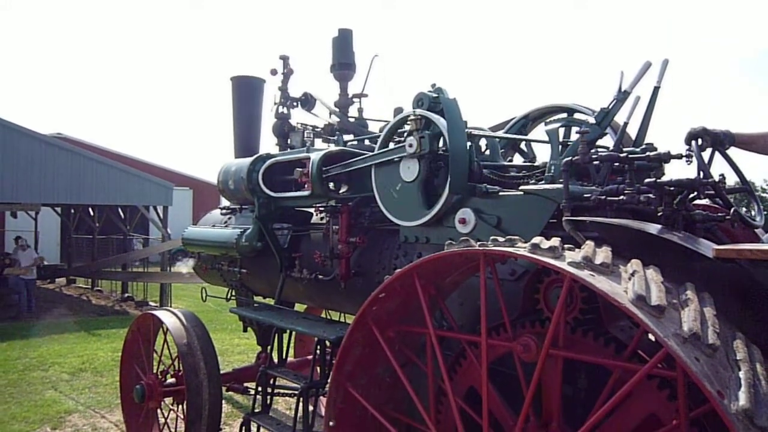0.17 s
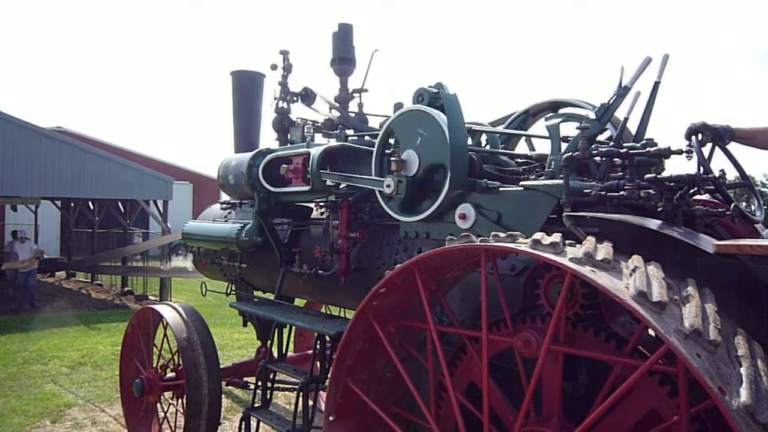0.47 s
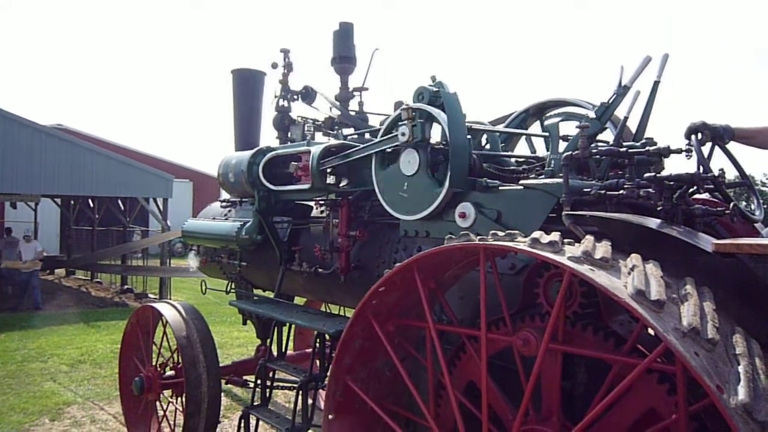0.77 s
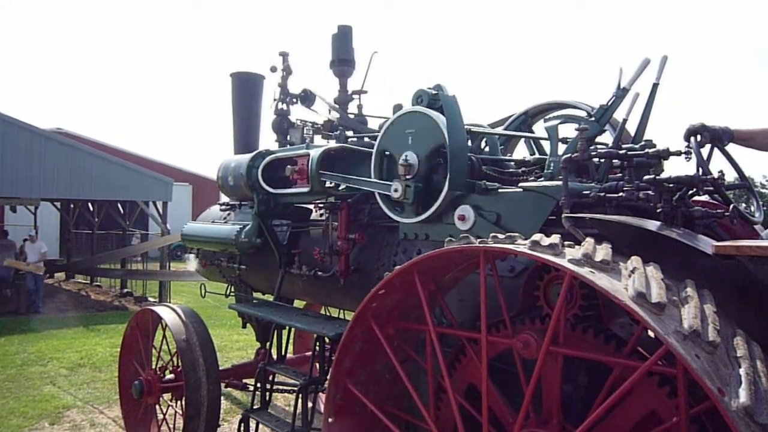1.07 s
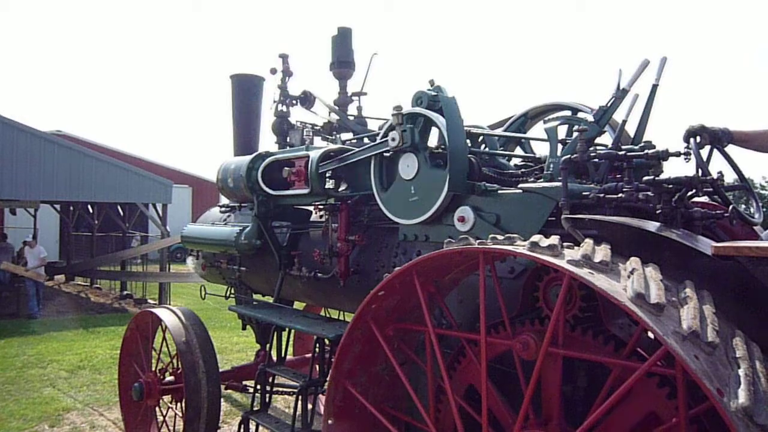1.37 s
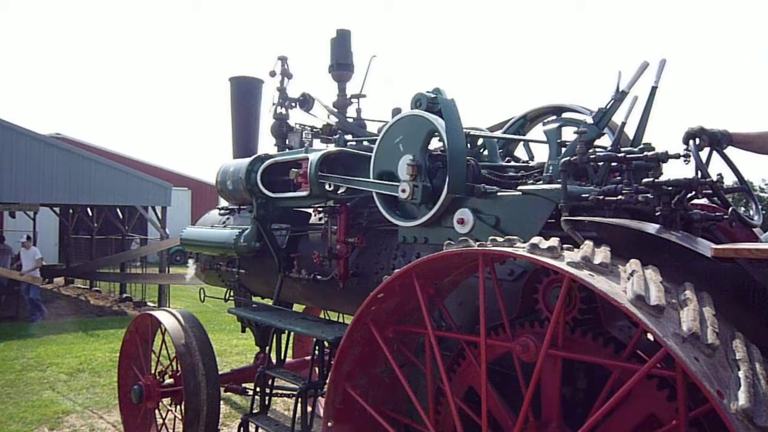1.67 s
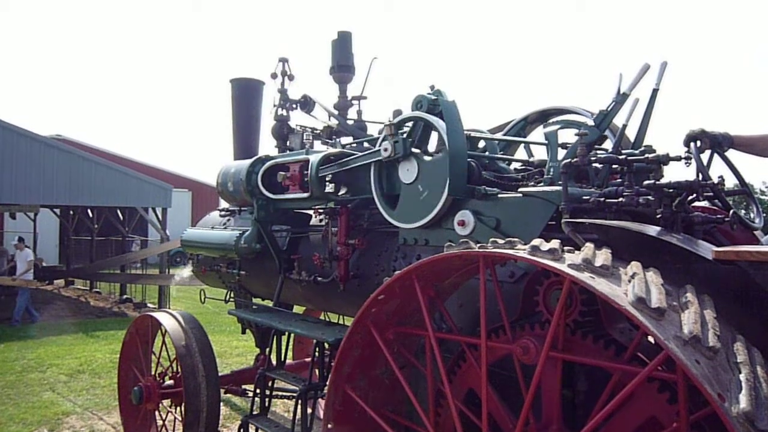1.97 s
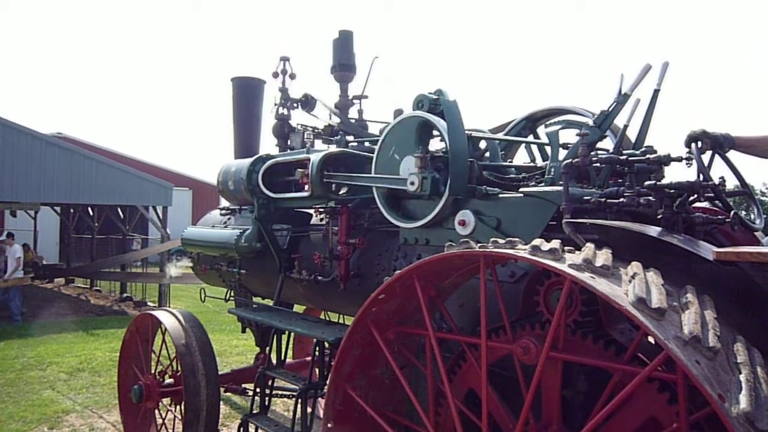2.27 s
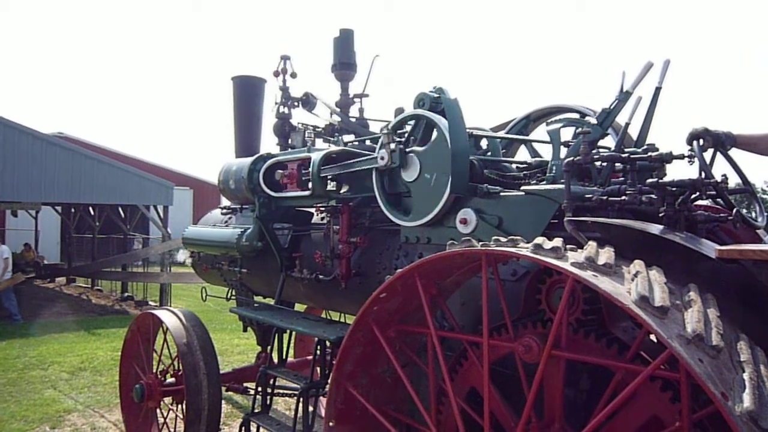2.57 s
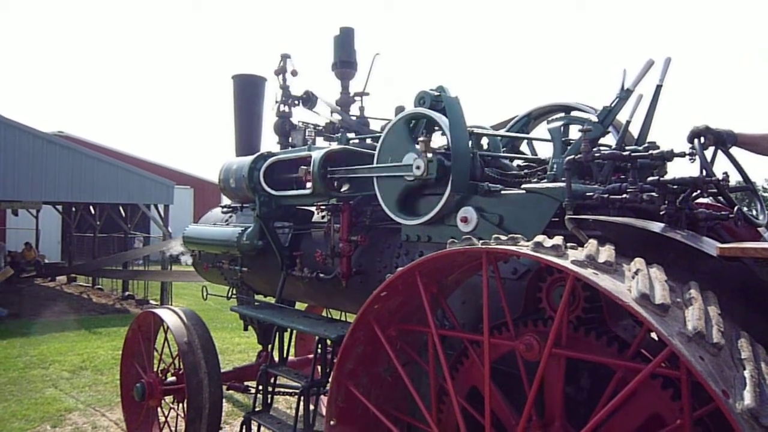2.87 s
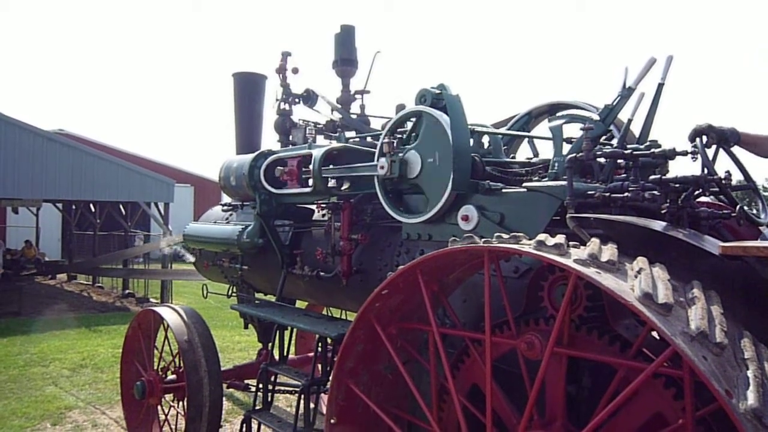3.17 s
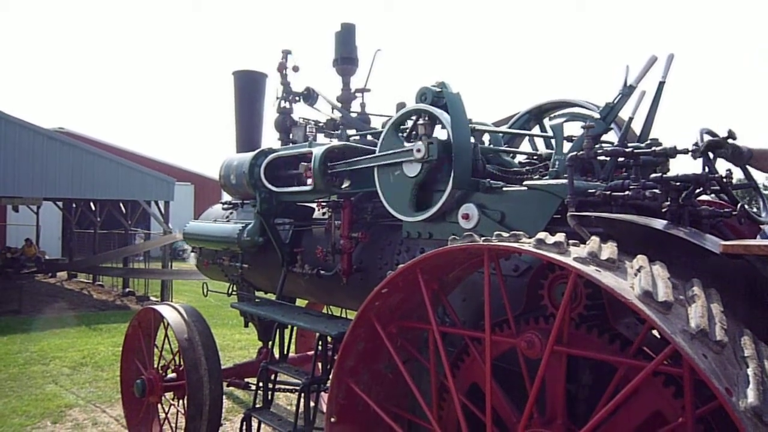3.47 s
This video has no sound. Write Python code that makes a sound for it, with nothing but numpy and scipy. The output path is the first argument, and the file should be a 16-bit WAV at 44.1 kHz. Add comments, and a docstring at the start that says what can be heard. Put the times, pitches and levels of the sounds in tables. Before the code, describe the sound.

Close to a steam traction engine on an open show ground, bearings and gears knock in the same fast pattern throughout, over droning rumble; faint low puffs, a little hiss and thin squeals. Dull, narrow-band sound.

```python
"""A steam traction engine turns over steadily on a show ground, about five turns a second, heard from close by.
Its bearings, gears and valve gear knock in the same pattern every turn: noise bursts exciting resonances.
Beneath lie the drive's rumble, part periodic and part random, the gear's notes and humming plates (narrow noise).
A second engine puffs dully at its own slower pace (decaying sines); a little steam spits (filtered noise)
and squeals faintly (wavering sines), and there is one thin, bright tick (a band-passed decay)."""
import sys
import numpy as np
from scipy import signal
from scipy.fft import rfft, irfft
from scipy.io import wavfile

SR = 44100
rng = np.random.default_rng(int(sys.argv[2]) if len(sys.argv) > 2 else 0)


def wav_record(signal):
    """Record a signal, one row per channel, as 16-bit PCM in the file named by sys.argv[1]."""
    frames = np.transpose(np.atleast_2d(signal))
    bounded = np.clip(frames, -1, 1)
    # unit amplitude maps onto the largest positive 16-bit level
    quanta = np.round(bounded * 32767).astype(np.int16)
    wavfile.write(sys.argv[1], SR, quanta)


N = 160083
SIZE, LEAD = 8192, 400  # samples: length of one event, and silence ahead of a burst

# turns of the crankshaft: t/s, then level changes of the crank knock/dB, crosshead knock/dB,
# return stroke/dB and clinks of the forward stroke/dB
TURNS = [(-0.043, 3, 3, -0.5, 1.5), (0.1612, 0, -1.8, -1, 0.1), (0.366, 0.5, -1.3, 1.8, -2.1),
         (0.572, 0.8, 1.7, 0, -0.2), (0.7767, -1, 2, 2.5, -1.8), (0.983, -0.5, 0.5, 0.5, 1.4),
         (1.188, -2, 3.2, -0.1, -1.2), (1.3711, -8, -0.3, 1.4, -5.5), (1.5755, 0.1, 1.8, -2, -4.5),
         (1.78, 0.8, -4, 1, -3), (1.986, -1, -2.5, 2, -1.4), (2.191, 0.3, 0.2, -1.6, -2.6),
         (2.396, -0.2, 0.5, 0.5, -1.7), (2.6013, -1.6, 1.3, -0.2, -5.8), (2.807, 0.8, -3, 0, -3.4),
         (3.013, 1.1, 1.6, 4.1, 0.5), (3.2187, 1.5, -1.9, 2.7, 0.2), (3.4247, -0.2, 2, -0.8, -2.2),
         (3.63, -1, 0.0, 10, 5)]
# resonances of the moving parts: f/Hz, half width/Hz, relative level/dB
CRANK = [(189, 68, -9.5), (473, 88, -3.5), (905, 42, -1.5), (986, 77, -1.5), (1270, 90, -8),
         (1510, 190, -12.5), (1800, 151, -12), (2310, 110, -19), (2850, 91, -18), (3180, 300, -19),
         (3646, 175, -21)]
GEARS = [(540, 280, -18), (860, 29, -8), (1006, 55, -2), (1290, 95, -10), (1440, 45, -16),
         (1770, 260, -20.5), (2700, 320, -11.5), (3440, 260, -13.5)]
CROSSHEAD = [(236, 45, -3.5), (459, 27, 2.5), (650, 390, -8.5), (925, 115, -4), (1160, 45, -5),
             (1270, 94, -15), (1680, 23, -10), (1940, 330, -19), (2445, 110, -13), (2820, 53, -21.5),
             (3235, 76, -11.5), (3600, 200, -20.5)]
VALVE = [(367, 87, -1), (626, 26, 2), (892, 350, -4.5), (974, 390, -15.5), (1210, 65, 3.5),
         (1710, 470, -18), (1857, 51, 0), (2720, 200, -20)]
PIN = [(256, 100, -9), (456.5, 260, -22.5), (608, 97, -4), (930, 380, -2.5), (1335, 50, 0),
       (1710, 48, -4.5), (1884, 25, -7.5), (2260, 160, -19), (2850, 52, -11.5), (3360, 220, -18.5)]


def amp(db):
    """Level to amplitude ratio: 20 dB is a factor of ten."""
    return 10 ** (np.asarray(db) / 20)


def evened(x):
    """Normalization to unit rms, that is unit mean power."""
    return x / np.sqrt(np.mean(x ** 2) + 1e-20)


def add(mix, s, sound):
    """Linear superposition of a sound, starting at s seconds."""
    at = round(s * SR)
    sound = sound[max(-at, 0):]
    part = mix[max(at, 0):][:len(sound)]
    part += sound[:len(part)]


def coloured(x, points):
    """Zero-phase filtering: gains at (f/Hz, level/dB) points are joined along a logarithmic frequency axis."""
    hz, db = np.transpose(points)
    f = np.fft.rfftfreq(len(x), 1 / SR)
    gain = amp(np.interp(np.log(f + 1), np.log(hz), db))
    return irfft(rfft(x) * gain, len(x))


def wander(hz):
    """Band-limited random motion: white noise under a Gaussian low-pass, with unit rms."""
    f = np.fft.rfftfreq(N, 1 / SR)
    lowpass = np.exp(-(f / hz) ** 2)
    return evened(irfft(rfft(rng.standard_normal(N)) * lowpass, N))


def whitened(x):
    """Spectral flattening: the phases, which carry the timing, stay while every magnitude becomes equal."""
    phase = np.angle(rfft(x))
    return evened(irfft(np.exp(1j * phase), len(x)))


def response(modes):
    """Modal superposition: resonances add in power, and the cepstrum gives the causal minimum phase."""
    f = np.fft.rfftfreq(SIZE, 1 / SR)
    power = sum((amp(db) / (1 + ((f - hz) / width) ** 2)) ** 2 for hz, width, db in modes)
    gain = evened(np.sqrt(power))
    cepstrum = irfft(np.log(gain + 1e-5))
    cepstrum[1:SIZE // 2] *= 2
    cepstrum[SIZE // 2 + 1:] = 0
    return np.exp(rfft(cepstrum))


def rattle(rise_s, decay_s):
    """Contact excitation: a bearing taking up its slack makes a burst of tiny impacts, an enveloped noise."""
    tail_db, tail_s = -18, 0.0099  # the boiler and frame ring on after a knock
    t = np.maximum(np.arange(SIZE) - LEAD, 0) / SR
    rise = np.minimum(t / rise_s, 1)
    decay = np.exp(-np.maximum(t - rise_s, 0) / decay_s)
    tail = amp(tail_db) * np.exp(-t / tail_s)
    return evened(rise * (decay + tail) * rng.standard_normal(SIZE))


def strikes(modes, times, levels_db, rise_s, decay_s, alike):
    """Source-filter principle: one contact's force, partly alike on every turn, drives the part's resonances."""
    slack_s, spread_db = .0006, 0.43  # play in the bearings: scatter of time and strength
    out, body = np.zeros(N), response(modes)
    habit = whitened(rattle(rise_s, decay_s))
    scale = np.sqrt(.02 * SR / SIZE)  # levels are rms over 20 ms
    for s, db in zip(times, levels_db):
        late, strong = rng.standard_normal(2)
        force = np.sqrt(alike) * habit + np.sqrt(1 - alike) * rattle(rise_s, decay_s)
        knock = evened(irfft(rfft(force) * body))
        start = s + slack_s * late - LEAD / SR
        add(out, start, scale * amp(db + spread_db * strong) * knock)
    return out


def knocks():
    """Modal excitation: each part thuds with its low resonances, then clinks with its high ones."""
    # knocks within one turn: part, strength column, delay t/s, thud level/dB, thud rise/s, thud decay/s,
    # clink lag/s, clink level/dB, clink rise/s, clink decay/s
    contacts = [ (CRANK, "crank", -.0065, -25, .004, .004, .0065, -33.5, 0.0011, 0.0028),
                (CRANK, "crank", 0.001997, -26, .001, 0.0077, 0.00097, -35, 0.00052, 0.0083),
                (GEARS, "crank", .002, -22, .003, 0.022, .014, -37.5, 0.0081, .006),
                (CROSSHEAD, "crosshead", .025, -22, .005, .008, 0.0061, -33, .003, .0035),
                (VALVE, "even", .083, -27.3, 0.007, 0.0051, .002, -50.5, 0.0026, .005),
                (PIN, "return", .138, -24, .009, 0.011, .002, -35, 0.0081, 0.011),
                (GEARS, "return", .157, -26.5, .009, 0.0055, 0.0034, -43, 0.0031, .008), ]
    clink_above_hz = 2100
    thud_alike, clink_alike = .6, .5  # share of the force's power that is the same on every turn
    times, crank, crosshead, back, clinks = np.transpose(TURNS)
    even = np.zeros(len(times))
    # level changes of thud and clink
    strength = {"crank": (crank, clinks), "crosshead": (crosshead, clinks),
                "return": (back, even), "even": (even, even)}
    out = np.zeros(N)
    for (modes, column, delay, thud_db, rise, decay,
         lag, clink_db, clink_rise, clink_decay) in contacts:
        low = [m for m in modes if m[0] < clink_above_hz]
        high = [m for m in modes if m[0] >= clink_above_hz]
        thud, clink = strength[column]
        out += strikes(low, times + delay, thud_db + thud, rise, decay, thud_alike)
        out += strikes(high, times + delay + lag, clink_db + clink, clink_rise, clink_decay, clink_alike)
    return out


def gear_notes():
    """Transient tone: the big gear sings hollowly, twice a turn, as the load reverses."""
    # delay t/s, f/Hz, peak level/dB, rise/s, decay/s
    notes = [(.003, 981, -22.5, .007, 0.024), (.160, 1006, -22, .008, 0.0062)]
    scatter_hz = 22
    out, t = np.zeros(N), np.arange(SIZE) / SR
    for start, *_ in TURNS:
        for delay, hz, db, rise, decay in notes:
            shape = np.minimum(t / rise, 1) * np.exp(-np.maximum(t - rise, 0) / decay)
            pitch = hz + scatter_hz * rng.standard_normal()
            add(out, start + delay, amp(db) * shape * np.sin(2 * np.pi * pitch * t))
    return out


def rumble():
    """Periodic plus random excitation: the same gear teeth pass each turn amid the roar of belt and fire."""
    # colour of gearing, belt and fire: f/Hz, relative spectral level/dB
    colour = [(20, -36), (45, -24), (58, -18.5), (72, -4.5), (100, -5.5), (150, -3), (195, 3.5), (220, 0),
              (250, -0.5), (315, -1.5), (450, 0.5), (600, -0.5), (730, -4), (970, -0.5), (1300, -6),
              (1500, -12), (1850, -12), (2100, -16.5), (2800, -16), (3500, -19.5), (3800, -25), (4000, -31),
              (4250, -42.5), (4550, -64.5)]
    level_db, alike = -25.5, 0.37  # rms; share of the power that repeats every turn
    flutter_db, flutter_hz = 0.83, 56.3  # rms change of level, and its rate
    times = np.array([row[0] for row in TURNS])
    longest = round(np.diff(times).max() * SR) + 2
    teeth, turn = np.zeros(N), whitened(rng.standard_normal(longest))
    for start, end in zip(times, times[1:]):
        add(teeth, start, turn[:round((end - start) * SR)])
    drive = np.sqrt(alike) * teeth + np.sqrt(1 - alike) * rng.standard_normal(N)
    flutter = amp(flutter_db * wander(flutter_hz))
    return amp(level_db) * evened(coloured(drive * flutter, colour))


def plates():
    """Narrow-band resonance: shaken ironwork hums as carriers with randomly wavering amplitude and phase."""
    # plates of the boiler and wheels: f/Hz, width/Hz, rms level/dB
    hums = [(120.5, 10, -45.5), (155.6, 10, -46), (193.6, 11, -41), (244.2, 12, -39.5), (265.9, 14, -42),
            (455, 9.3, -43), (600.6, 9.2, -42), (788, 13, -39), (964, 33, -40), (1524, 40, -49.5)]
    t, out = np.arange(N) / SR, np.zeros(N)
    for hz, width, db in hums:
        envelope = wander(width) + 1j * wander(width)
        hum = (np.exp(2j * np.pi * hz * t) * envelope).real
        out += amp(db) * evened(hum)
    return out


def puffs():
    """Damped oscillation: each exhaust beat of the other engine sets the air in a chimney booming briefly."""
    # exhaust beats: t/s, level/dB
    beats = [(.004, -32.5), (0.248, -30.5), (.506, -28), (.759, -33.5), (1.008, -34), (1.265, -33),
             (1.497, -28.5), (1.742, -39.5), (2.009, -29.5), (2.271, -33.5), (2.515, -31), (2.766, -30),
             (3.03, -34), (3.1, -47.5), (3.275, -37.5), (3.537, -29)]
    boom_hz, peak_s = 72.5, 0.011
    out, t = np.zeros(N), np.arange(SIZE) / SR
    boom = t / peak_s * np.exp(1 - t / peak_s) * np.sin(2 * np.pi * boom_hz * t)
    for s, db in beats:
        add(out, s, amp(db) * boom)
    return out


def steam():
    """Jet noise and whistling: a gland spits filtered noise, and squeals are frequency-modulated sines."""
    # level of the spitting: t/s, level/dB
    spit = [(.58, -60.5), (.63, -36), (0.741, -39.5), (.82, -60.5), (1.25, -59), (1.32, -44),
            (1.354, -30.5), (1.395, -27.5), (1.42, -39)]
    # its colour: f/Hz, relative spectral level/dB
    spit_colour = [(800, -13), (1600, -3.5), (2250, 10), (2700, 4.5), (3500, 4), (4000, -15.5), (4500, -24)]
    # thin squeals of escaping steam: start t/s, length/s, f/Hz, peak level/dB
    squeals = [(.61, .10, 3450, -39), (0.47, 0.15, 3595, -47.5), (.60, .14, 4900, -49),
               (1.7, 0.11, 3570, -43)]
    waver_hz, waver_rate_hz = 28, 120  # rms deviation of pitch, and its rate
    t, (at, db) = np.arange(N) / SR, np.transpose(spit)
    hiss = evened(coloured(rng.standard_normal(N), spit_colour))
    out = amp(np.interp(t, at, db, left=-np.inf, right=-np.inf)) * hiss  # silent outside the table
    for start, length, hz, level_db in squeals:
        swell = np.sin(np.pi * np.clip((t - start) / length, 0, 1))
        pitch = hz + waver_hz * wander(waver_rate_hz)
        out += amp(level_db) * swell * np.sin(2 * np.pi * np.cumsum(pitch) / SR)
    return out


def tick():
    """Impulse-like transient: a tiny, thin, bright tick, since a very short decay has a broad spectrum."""
    at_s, level_db, decay_s = 1.387, -19, .0002  # level ahead of the band-pass
    band_hz = (4000, 16000)
    out = np.zeros(N)
    add(out, at_s, amp(level_db) * np.exp(-np.arange(LEAD) / SR / decay_s))
    bandpass = signal.firwin(255, band_hz, pass_zero=False, window=("kaiser", 9), fs=SR)
    return signal.oaconvolve(out, bandpass, "same")


def scene():
    """Superposition: the pressures of all sources add at one microphone."""
    return (knocks() + gear_notes() + rumble() + plates() + puffs() + steam())[None]


def record(dry):
    """Linear filtering: a small microphone thins bass and cuts treble; the tick and a constant offset are added."""
    # the microphone's colour: f/Hz, level/dB
    mic = [(20, -2.5), (40, -3), (58, -4.5), (70, -1), (3700, -0.5), (3950, -2.5), (4200, 1), (4400, -6.5),
           (4600, -20.5)]
    edge_hz, offset = 4640, -.0516  # steep upper band limit; constant share of full scale
    lowpass = signal.firwin(511, edge_hz, window=("kaiser", 9), fs=SR)
    sound = signal.oaconvolve(coloured(dry[0], mic), lowpass, "same")
    return (sound + tick() + offset)[None]


dry = scene()
out = record(dry)
wav_record(out)
```